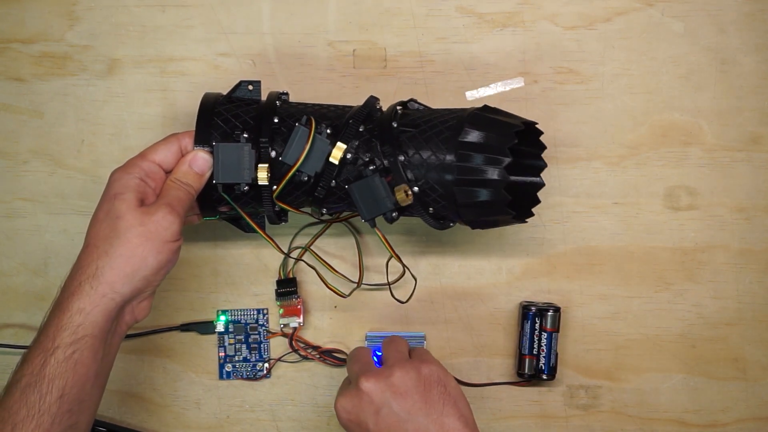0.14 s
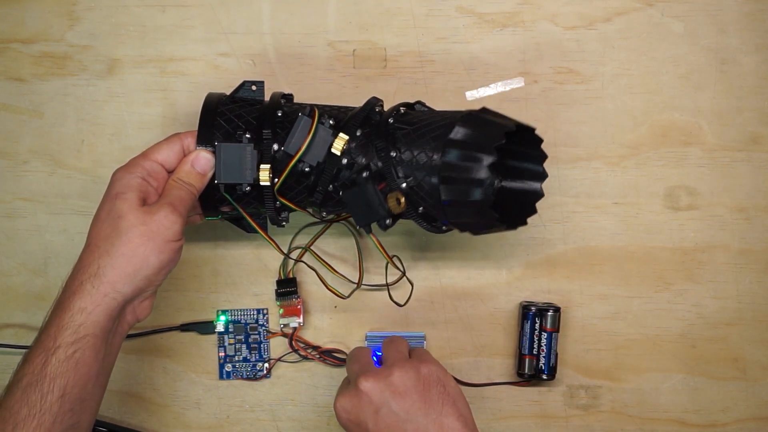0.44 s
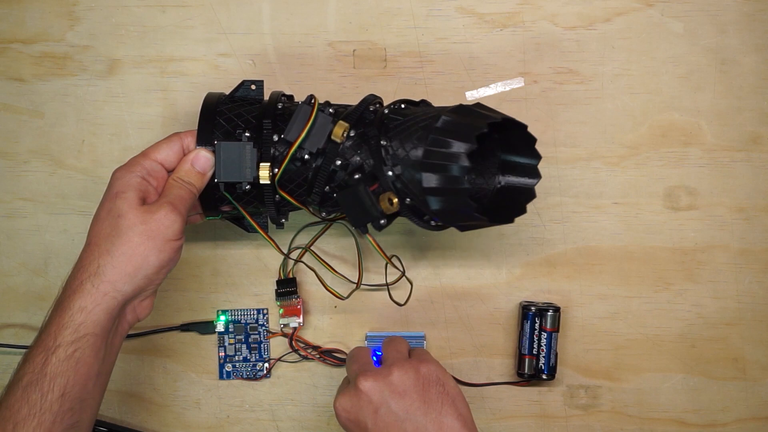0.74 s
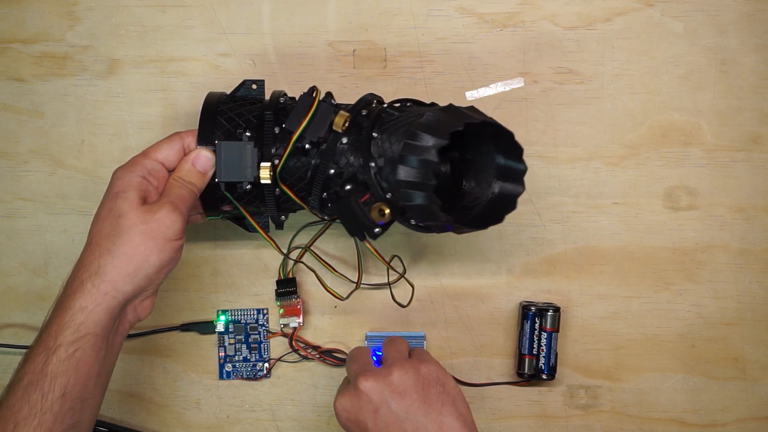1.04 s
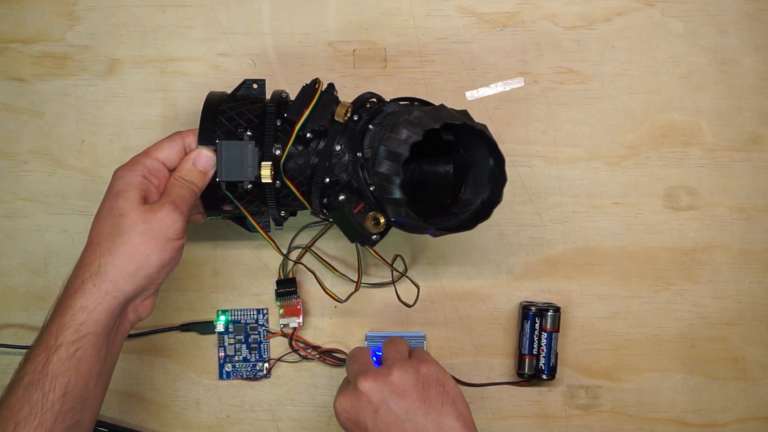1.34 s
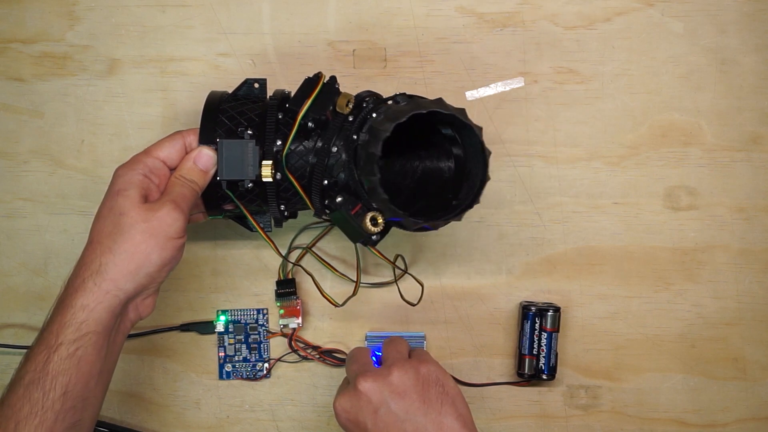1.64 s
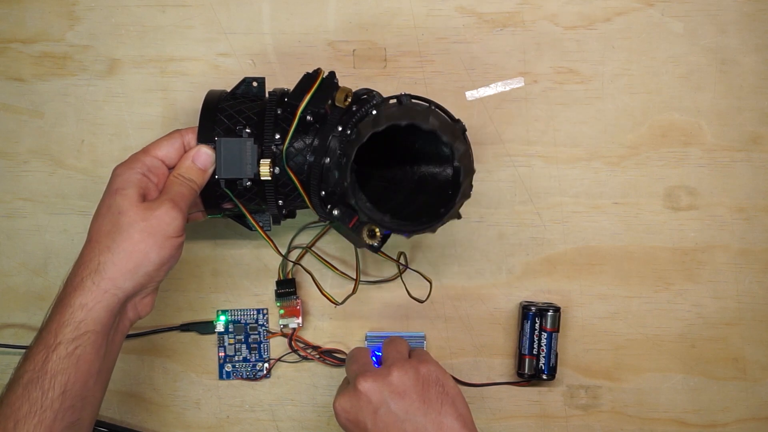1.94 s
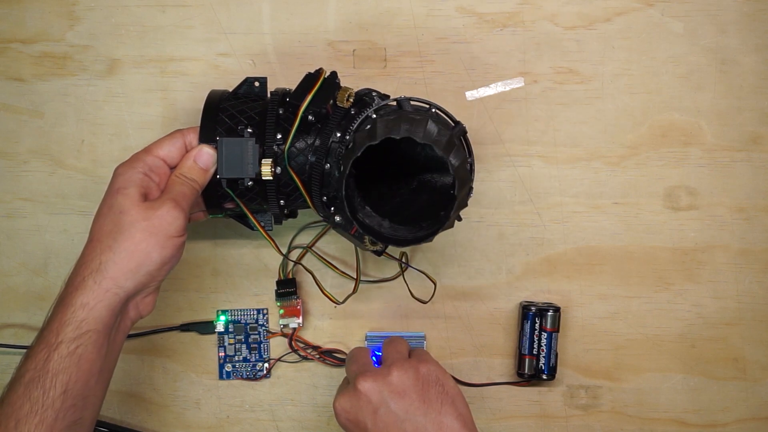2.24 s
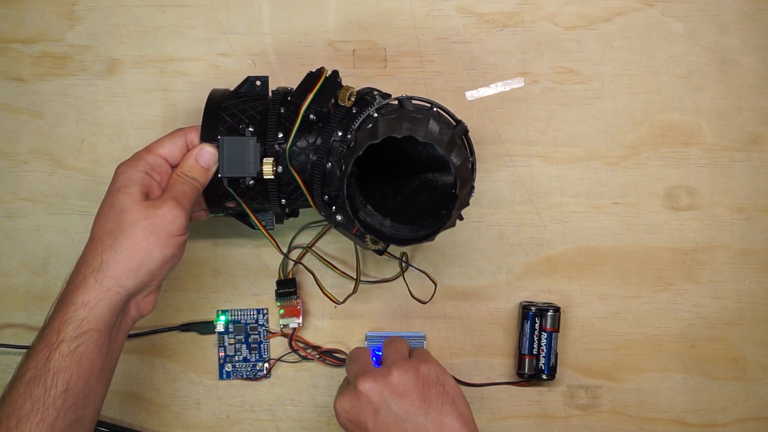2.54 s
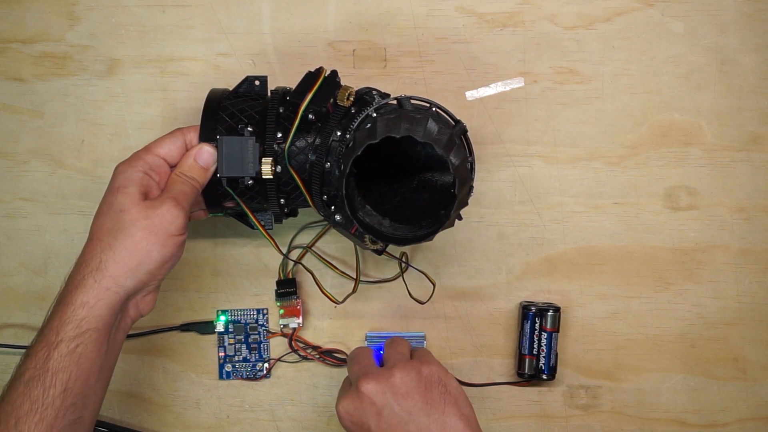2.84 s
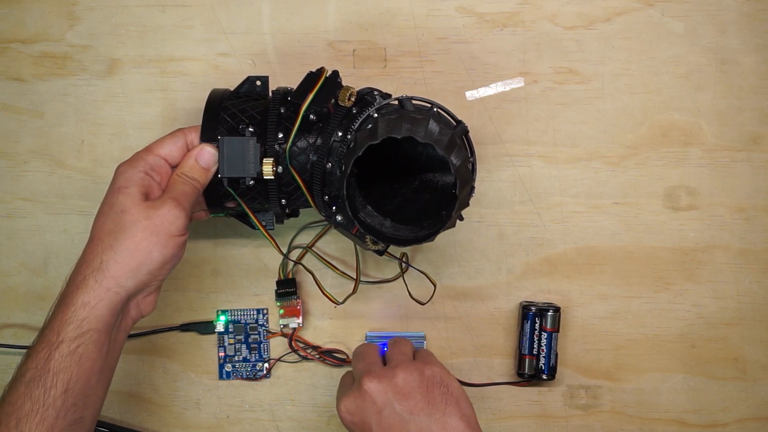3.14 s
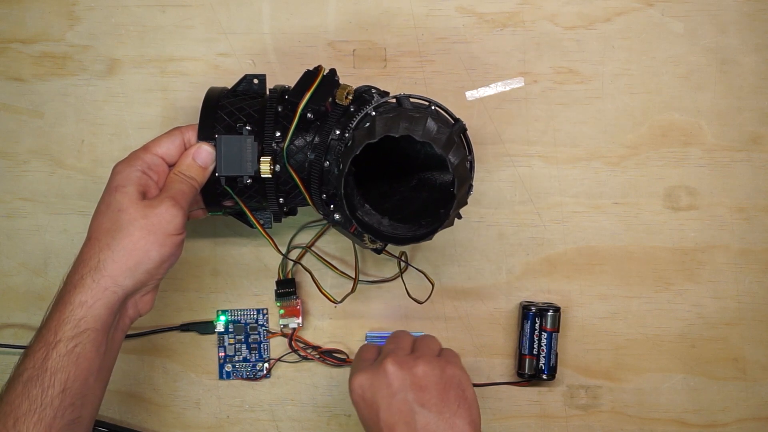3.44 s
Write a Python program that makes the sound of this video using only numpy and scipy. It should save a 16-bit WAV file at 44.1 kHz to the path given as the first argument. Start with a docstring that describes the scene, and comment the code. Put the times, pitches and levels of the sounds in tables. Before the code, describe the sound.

Small geared servo motors whine and rattle in a plastic shell, stop, then briefly restart.

```python
"""Geared servos are already whining and rattling on a workbench, swivelling a printed plastic nozzle.
The place is a small room in stereo: motor hum and pinion whine sound dry, the rattle carries more room.
Gear lines follow the shaft's turns; tooth strikes and sliding noise ring through the plastic shell.
The drive sags twice under load with a few knocks, stops, leaves a faint room hum, and starts again."""
import sys
import numpy as np
from scipy import signal
from scipy.fft import rfft, irfft
from scipy.io import wavfile
from scipy.ndimage import uniform_filter1d, map_coordinates

SR = 44100
rng = np.random.default_rng(int(sys.argv[2]) if len(sys.argv) > 2 else 0)


def bounce(signal):
    """Save signal as a 16-bit WAV file at the path given by the first command-line argument."""
    frames = np.transpose(np.atleast_2d(signal))
    limited = np.clip(frames, -1, 1)
    pcm = np.round(limited * 32767).astype(np.int16)
    wavfile.write(sys.argv[1], SR, pcm)


N = 158760  # samples, 3.6 s
TEETH = 9  # on each servo's pinion
SIDES = np.array([[1], [-1]])  # left, right


def amp(db):
    """Decibels to gain."""
    return 10 ** (np.asarray(db) / 20)


def unit(x):
    """Scales to rms 1."""
    return x / np.sqrt(np.mean(x ** 2) + 1e-20)


def read(points, hz):
    """Reads a spectrum on a log-frequency axis."""
    f, value = np.transpose(points)
    return np.interp(np.log(hz + 1), np.log(f + 1), value)


def curves(rows):
    """Each column of a timed table, at every sample."""
    s, *columns = np.transpose(rows)
    return [np.interp(np.arange(N) / SR, s, c) for c in columns]


def bins():
    """Frequencies of a whole-length spectrum."""
    return np.fft.rfftfreq(N, 1 / SR)


def colour(x, gain):
    """Filters by a gain per frequency."""
    return irfft(rfft(x) * gain, N)


def band(lo_hz, hi_hz):
    """Gain of a steep band-pass."""
    f = bins() + 1e-3
    return 1 / np.sqrt((1 + (lo_hz / f) ** 16) * (1 + (f / hi_hz) ** 16))


def drift(rate_hz):
    """Random wander of rms 1, low-passed around rate_hz."""
    step = 64  # samples between points of the wander
    size = N // step + 2
    f = np.fft.rfftfreq(size, step / SR)
    slow = irfft(rfft(rng.standard_normal(size)) / (1 + (f / rate_hz) ** 2), size)
    return np.interp(np.arange(N) / step, np.arange(size), unit(slow))


def running():
    """Drive of the servos: a short linear start, then an exponential coast after each stop."""
    # Each row: start in seconds, stop in seconds.
    moves = [(-.1, 2.105), (3.482, 3.7)]
    start_s, coast_s = 0.0054, 0.022
    t, drive = np.arange(N) / SR, np.zeros(N)
    for start, stop in moves:
        drive += np.clip((t - start) / start_s, 0, 1) * np.exp(-np.maximum(t - stop, 0) / coast_s)
    return drive


def partial(turns, db, rough, spread):
    """One spectral line, fluttering in level and phase, its phase drifting oppositely at each side."""
    swell = unit(1 + rough * drift(rate_hz=100))
    angle = 2 * np.pi * turns + rough * drift(rate_hz=16)
    return np.sqrt(2) * amp(db) * swell * np.cos(angle + spread * drift(rate_hz=7.2) * SIDES)


def whine(speed, turns):
    """Shaft hum and overtones, a second gear's mesh, and the pinion's tooth rate with its octave."""
    # Each row: time in seconds, level in dB before the room; for shaft hum, pinion whine, its octave.
    hum_levels = [(0, -50.5), (.2, -55), (.38, -44), (.47, -64), (.6, -52.5), (.85, -47.5), (1.05, -43.5),
                  (1.15, -48), (1.38, -49), (1.52, -45.5), (1.75, -44.5), (1.81, -53.5), (1.9, -45.5),
                  (2.09, -56.5), (3.48, -87), (3.6, -72)]
    whine_levels = [(0, -38), (.06, -37), (.19, -43.5), (.27, -43), (.35, -36), (.45, -56), (.65, -52),
                    (.76, -46), (.85, -40), (.95, -35.5), (1.015, -40), (1.035, -30), (1.1, -36),
                    (1.23, -32.5), (1.335, -25.5), (1.36, -31), (1.405, -31), (1.43, -54), (1.54, -42),
                    (1.6, -41.5), (1.85, -42.5), (1.94, -34), (2.01, -41.5), (2.07, -50), (3.48, -60),
                    (3.525, -40), (3.55, -66), (3.6, -44)]
    octave_levels = [(0, -58), (.12, -38.5), (.2, -34.5), (.3, -44), (.62, -50), (.69, -37), (.8, -51),
                     (1, -50), (1.15, -39), (1.37, -37), (1.43, -53), (1.58, -45), (1.68, -46), (1.82, -45),
                     (1.95, -44), (2.07, -47), (3.48, -80), (3.6, -65)]
    # Each row: multiple of the shaft speed, level in dB over the evened hum.
    orders = [(2, -4), (3, -3), (4, -3.5), (5, -13), (6, -14), (7, -21), (8, -1), (11, -11), (14, -6),
              (16, -6)]
    # Each row: multiple of the second gear's tooth rate, level in dB over the evened hum.
    second_orders = [(1, -15.5), (2, -2.5), (3, -6.5), (4, -22.5)]
    second_mesh = 1.605  # second gear's tooth rate over the shaft speed
    slope_db = 17  # per octave: overtones fade as the shaft slows

    hum_db, = curves(hum_levels)
    whine_db, = curves(whine_levels)
    octave_db, = curves(octave_levels)
    first_run = slice(2 * SR)
    # half the hum's swings in dB, tilted by speed
    even_db = (hum_db + np.median(hum_db[first_run])) / 2
    even_db = even_db + slope_db * np.log2(speed / np.median(speed[first_run]))

    out = partial(turns, hum_db, rough=0.32, spread=0.08)
    for k, db in orders:
        out += partial(round(k) * turns, even_db + db, rough=0.52, spread=0.33)
    for k, db in second_orders:
        out += partial(round(k) * second_mesh * turns, even_db + db, rough=0.51, spread=0.12)
    out += partial(TEETH * turns, whine_db, rough=0.13, spread=0.36)
    return out + partial(2 * TEETH * turns, octave_db, rough=0.2, spread=0.62)


def partner():
    """The second servo hunts around its speed, so its whine and the octave warble."""
    # Each row: time in seconds, mean shaft speed in Hz, level of the whine in dB before the room.
    second_servo = [(0, 365, -45), (.42, 350, -51), (.5, 355, -38), (.62, 350, -38), (.75, 358, -38),
                    (.9, 365, -40), (1.05, 362, -46), (1.4, 355, -47), (1.46, 335, -39), (1.6, 345, -50),
                    (2.08, 345, -48), (3.48, 350, -71), (3.6, 350, -64)]
    hunt_hz, hunt_share = 31, 0.04  # rate of the swing, and its size as a share of the speed
    octave_db = -1.5  # re the whine
    speed, db = curves(second_servo)
    swing = np.sin(2 * np.pi * hunt_hz * np.arange(N) / SR + 2 * drift(rate_hz=5.4))
    swing = swing + 0.6 * drift(rate_hz=37)
    mesh = TEETH * np.cumsum(speed * (1 + hunt_share * swing)) / SR
    tone = partial(mesh, db, rough=0.39, spread=0.5)
    return tone + partial(2 * mesh, db + octave_db, rough=0.8, spread=0.54)


def rattle(turns):
    """Teeth strike and slide, worn faces repeat with each turn of the gear, and the shell rings with it."""
    # Each row: time in seconds, then level of the middle, presence and treble in dB before their trims.
    levels = [(0, -35.5, -41, -33), (.1, -41.5, -36, -31.5), (.2, -40.5, -38.5, -30.5),
              (.32, -40, -35.5, -31.5), (.45, -39.5, -39.5, -33.5), (.53, -40.5, -35, -34),
              (.58, -37.5, -37.5, -31.5), (.72, -39, -38.5, -29), (.87, -41, -35, -29.5),
              (1.13, -40.5, -37.5, -30), (1.35, -43, -34.5, -30), (1.42, -34.5, -34, -34),
              (1.47, -40.5, -36.5, -35), (1.62, -39, -34, -32.5), (2, -40.5, -36, -32.5),
              (2.05, -35.5, -43, -29.5), (2.08, -43.5, -39.5, -38.5)]
    levels_again = [(3.49, -66, -49, -49.5), (3.526, -48, -40.5, -41.5), (3.552, -52, -40, -40.5),
                    (3.595, -41, -36.5, -33)]
    # Plastic shell. Each row: frequency in Hz, relative response in dB.
    shell_curve = [(120, -53), (200, -24), (289, -23.5), (418, -7.5), (511, -11), (636, -14), (703, -4),
                   (818, -5.5), (1020, -8.5), (1140, -8.5), (1260, -5), (1520, -3.5), (2060, -8.5),
                   (2240, -11), (2880, -2), (3130, -4.5), (3760, -0.5), (4090, -4.5), (5090, -8),
                   (6430, -3), (8550, -7), (10500, -3.5), (11000, -10), (14300, -49), (22000, -120)]
    # Narrow rings of the shell. Each row: frequency in Hz, width in Hz, lift in dB.
    rings = [(735, 110, 5), (841.8, 17, 12.5), (1257, 19, 5), (1780, 33, 0.5), (2540, 83, 2.5),
             (2800, 65, 5), (2960, 98, 1.5), (3210, 99, 0.5), (3350, 64, 1.5), (4680, 120, 2),
             (6240, 180, 4), (6750, 91, 3), (7280, 89, 0.5), (9900, 190, -0.5), (8000, 390, 0.5)]
    scatter_db, patchy_db, ripple_db = 1.0, 1.5, 1.5  # strike levels, force wander, fine shell response
    slide, worn, apart = 1.0, 0.61, 0.98  # gains: sliding noise, worn faces, left-right difference
    profile_turns = 4.98  # shaft turns to one turn of the next gear

    strikes = np.diff(np.floor(TEETH * turns), prepend=0)  # one click per tooth
    strikes = strikes * amp(scatter_db * (2 * rng.random(N) - 1)) * rng.choice([-1., 1.], N)
    size = 300  # points around a worn face
    place = turns / profile_turns % 1 * size
    profiles = rng.standard_normal((2, size))
    faces = [map_coordinates(p, [place], order=3, mode="grid-wrap") for p in profiles]

    force = unit(strikes) + slide * rng.standard_normal(N) + worn * faces[0]
    force = force + apart * (rng.standard_normal(N) + worn * faces[1]) * SIDES
    throb = 1 + 0.11 * np.cos(2 * np.pi * turns)  # once per shaft turn
    force = force * throb * amp(patchy_db * drift(rate_hz=79))

    f = bins()
    small_modes = ripple_db * unit(uniform_filter1d(rng.standard_normal(len(f)), size=160))
    lift = sum(db / (1 + (2 * (f - hz) / width) ** 2) for hz, width, db in rings)
    shell = amp(read(shell_curve, f) + small_modes + lift)

    middle, presence, treble = curves(list(levels) + list(levels_again))
    parts = [
        (band(160, 2430), middle - 1),
        (band(1890, 4300), presence - 2),
        (band(4520, 15100), treble - 1),
    ]
    return sum(unit(colour(force, shell * gain)) * amp(db) for gain, db in parts)


def background():
    """Room air as coloured noise, faint wavering hums, a deep drone that swells, and low rumble."""
    # Each row: frequency in Hz, relative level of the air in dB per Hz.
    air_curve = [(15, -36), (25, -24), (48, -11), (85, -18.5), (118, -13.5), (156, -10.5), (229, -3.5),
                 (296, -8), (480, -10), (603, -9.5), (1060, -14), (1360, -17.5), (2580, -19),
                 (10200, -30.5), (11000, -36), (14300, -77), (22000, -120)]
    # Each row: frequency in Hz, left-right correlation of the air.
    likeness = [(60, 0.75), (220, 0.81), (830, -0.1), (3090, -0.069), (11500, 0.12)]
    # Each row: hum frequency in Hz, level in dB.
    hum_lines = [(60, -68.5), (120, -72), (359, -73), (479, -71.5), (1080, -73.5)]
    # Each row: time in seconds, drone frequency in Hz, level in dB.
    drone_path = [(0.0, 40.5, -68), (0.07, 42, -93), (0.22, 44.56, -66), (1.54, 43.47, -54.5),
                  (2.5, 43.1, -60.5), (3.11, 43.7, -83), (3.6, 43.7, -85)]
    # Each row: time in seconds, rumble level in dB.
    rumble_levels = [(0, -60), (.45, -56.5), (1, -59.5), (2.1, -62), (2.6, -62.5), (3.6, -73)]
    air_db = -58
    t = np.arange(N) / SR
    a, b = rng.standard_normal((2, N))

    same = np.clip(read(likeness, bins()), -1, 1)
    right = colour(a, same) + colour(b, np.sqrt(1 - same ** 2))
    air = amp(air_db) * unit(colour(np.array([a, right]), amp(read(air_curve, bins()))))
    hums = sum(partial(hz * t, db, rough=0.39, spread=0.25) for hz, db in hum_lines)
    drone_hz, drone_db = curves(drone_path)
    drone = np.sqrt(2) * amp(drone_db) * np.sin(2 * np.pi * np.cumsum(drone_hz) / SR)
    rumble_db, = curves(rumble_levels)
    rumble = amp(rumble_db) * unit(colour(rng.standard_normal(N), band(31, 120)))
    return air + hums + drone + rumble


def singing():
    """The shell sings in narrow rings that swell and die away, each a fluttering line."""
    # Rings the gears dwell on. Each row: start and length in seconds, frequency in Hz,
    # level in dB before the swell and the room.
    dwells = [(0.118, 0.2, 2040, -45.5), (0.127, .13, 1270, -43.5), (0.238, 0.16, 2965, -40.5),
              (0.296, .2, 4580, -47.5), (0.465, 0.064, 6310, -36), (0.657, .13, 2930, -36),
              (0.686, .14, 855.6, -41), (1.198, 0.34, 2920, -42.5), (1.41, 0.14, 772, -44.5),
              (1.432, 0.16, 2810, -36), (1.683, 0.18, 1284, -42), (1.86, 0.16, 6170, -42.5),
              (3.549, 0.13, 2600, -40.5), (3.569, 0.053, 751, -44)]
    edge_s = 0.031  # linear rise and fall
    t, out = np.arange(N) / SR, np.zeros((2, N))
    for s, length, hz, db in dwells:
        swell = np.clip(np.minimum(t - s, s + length - t) / edge_s, 0, 1)
        out += swell * partial(hz * t, db, rough=0.58, spread=0.31)
    return out


def knocks():
    """Slack in the gears is taken up with a short chatter: decaying bursts of narrow-band noise."""
    # Backlash knocks as the load changes, and one faint tick at rest.
    # Each row: start in seconds, level in dB before the envelope and the room, centre in Hz.
    backlash = [(0.442, -28.5, 2430), (0.531, -30, 900), (.536, -37, 3200), (1.404, -28, 1270),
                (1.421, -22, 2370), (1.465, -29, 3000), (2.005, -26, 3580), (2.042, -39, 6160),
                (2.082, -29, 1200), (3.098, -62.5, 2300), (3.529, -40, 1750), (3.592, -30, 2650)]
    decay_s, half_width_octaves = 0.0056, 0.19
    t, out = np.arange(N) / SR, np.zeros(N)
    for s, db, hz in backlash:
        age = np.maximum(t - s, 0) / decay_s
        octaves = np.log2((bins() + 1) / hz)
        ring = unit(colour(rng.standard_normal(N), 1 / (1 + (octaves / half_width_octaves) ** 2)))
        out += amp(db) * ring * np.minimum(age * 6, 1) * np.exp(-age)
    return out


def room(x, wet_db):
    """Sparse reflections, each band dying at its own speed; the servos were already running."""
    # Each row: frequency in Hz, time to fall by 60 dB in seconds.
    decay = [(250, 0.15), (700, 0.38), (1700, 0.59), (4600, 0.54), (11000, 0.47)]
    gap_s, taps_per_s = 0.005, 4000  # silence before the first reflection, mean density
    hits = rng.choice([-1., 1.], (2, SR)) * (rng.random((2, SR)) < taps_per_s / SR)
    taps = hits * (np.arange(SR) / SR > gap_s)
    hz, t, z = signal.stft(taps, SR, nperseg=256)
    tail = signal.istft(z * amp(-60 * t / read(decay, hz)[:, None]), SR, nperseg=256)[1]
    # the opening, mirrored ahead of time zero, fills the room before the start
    lead = SR // 4
    earlier = np.pad(x, ((0, 0), (lead, 0)), "reflect")
    wet = signal.fftconvolve(earlier, tail / np.linalg.norm(tail[0]), axes=1)[:, lead:lead + N]
    return (x + amp(wet_db) * wet) / np.sqrt(1 + amp(wet_db) ** 2 / 2)


def scene():
    """One shaft speed drives the first servo's gears; its partner, the shell and the room join in."""
    # Motor shaft, sagging under load, then after the restart. Each row: time in seconds, speed in Hz.
    shaft = [(0.0, 339.9), (0.04, 380.1), (0.09, 432.5), (0.13, 403.9), (0.19, 402.0), (0.25, 410.1),
             (0.31, 422.1), (0.39, 427.5), (0.46, 418.1), (0.52, 373.5), (0.6, 334.4), (0.65, 402.6),
             (0.7, 425.1), (0.8, 426.1), (0.93, 431.1), (1.05, 425.9), (1.2, 424.4), (1.31, 418.4),
             (1.405, 423.6), (1.45, 347.5), (1.52, 369.9), (1.58, 412.5), (1.65, 431.4), (1.79, 423.1),
             (1.85, 424.4), (1.9, 436.4), (1.99, 438.6), (2.06, 453.9), (2.09, 450.9)]
    shaft_again = [(3.484, 433.1), (3.52, 448.4), (3.6, 443.4)]
    # Each row: frequency in Hz, left minus right in dB.
    balance = [(200, 3), (400, .7), (800, 2), (2000, 1.9), (3800, 1.5), (6400, 1.5), (9000, 1), (11000, -1)]
    # Each row: frequency in Hz, gain of the stereo side signal in dB.
    stereo_width = [(300, -5), (1000, -7), (2500, -3), (5000, -0.5), (11000, -2.5)]
    speed, = curves(list(shaft) + list(shaft_again))
    turns = np.cumsum(speed * (1 + 0.0015 * drift(rate_hz=35))) / SR

    tones = room(running() * (whine(speed, turns) + partner()) + singing(), wet_db=-13)
    clatter = room(running() * rattle(turns) + knocks(), wet_db=-3)
    both = tones + clatter
    side = colour(both[0] - both[1], amp(read(stereo_width, bins()))) / 2
    lean = amp(read(balance, bins()) * SIDES / 2)
    return colour(both.mean(0) + side * SIDES, lean) + background()


def record(dry):
    """The recorder's band limit: a steep low-pass on both microphone channels."""
    edge_hz = 11130
    taps = signal.firwin(601, edge_hz, window=("kaiser", 8), fs=SR)
    return signal.oaconvolve(dry, taps[None], "same", axes=1)


dry = scene()
out = record(dry)
bounce(out)
```